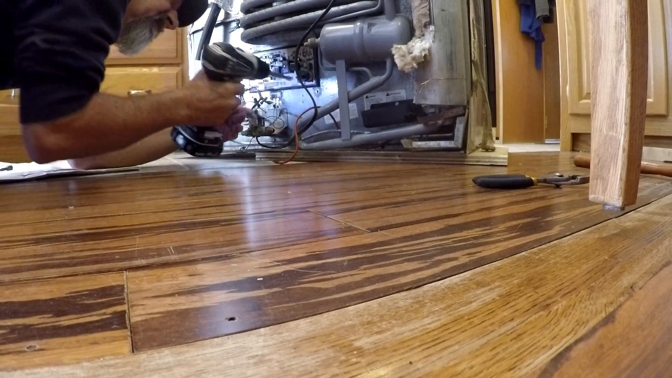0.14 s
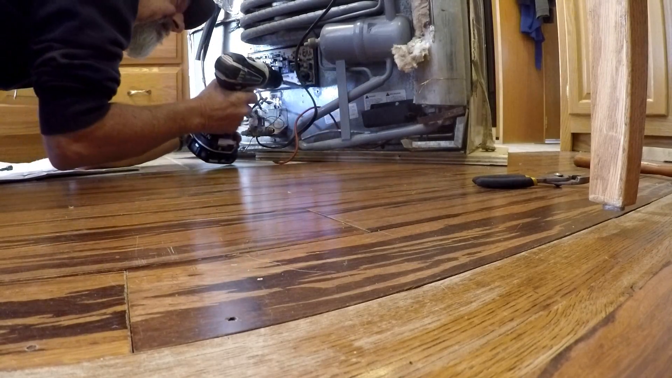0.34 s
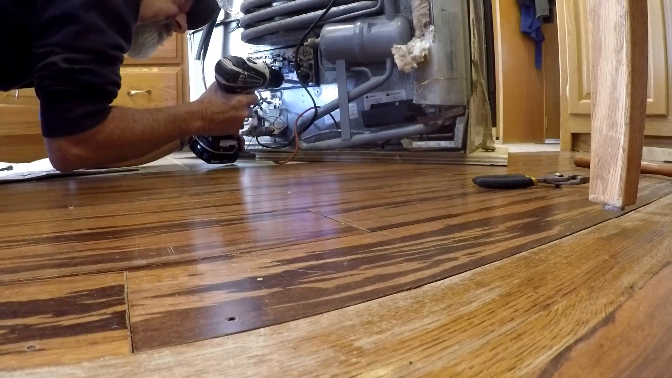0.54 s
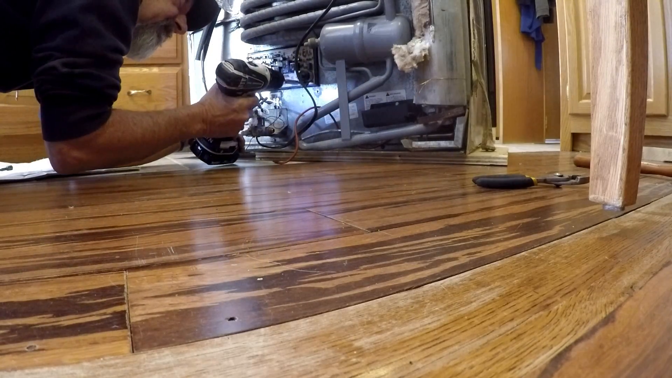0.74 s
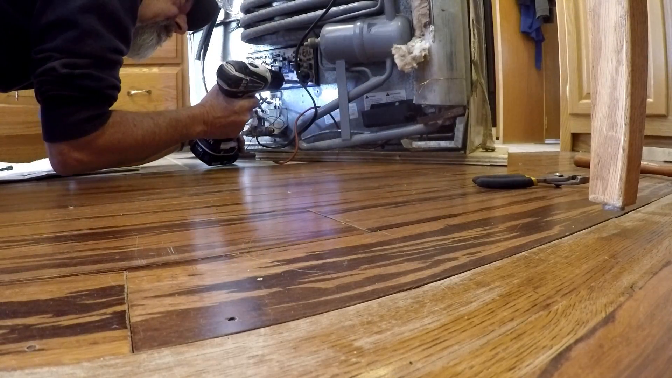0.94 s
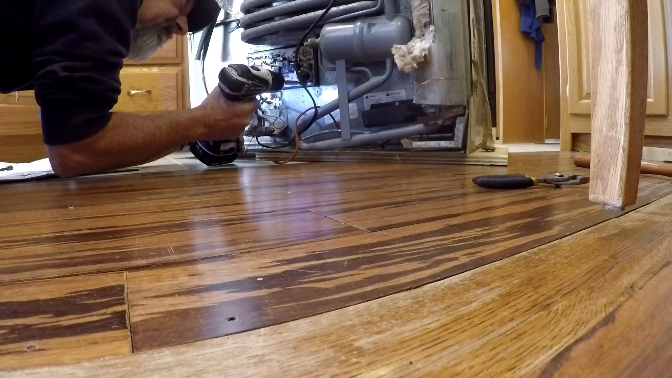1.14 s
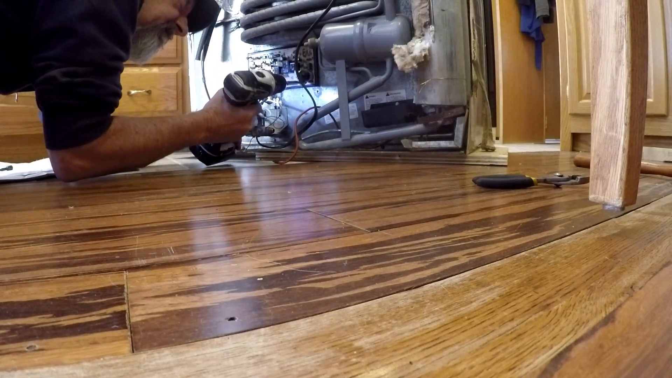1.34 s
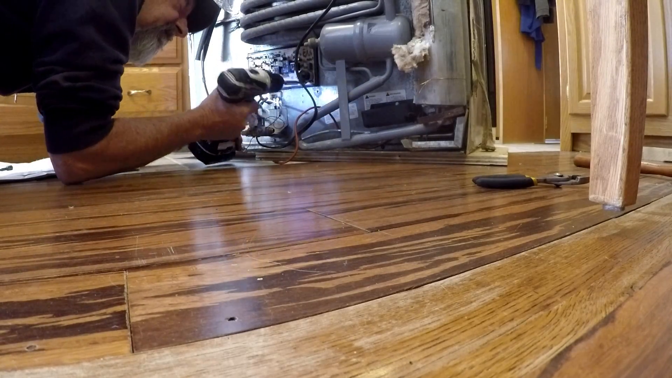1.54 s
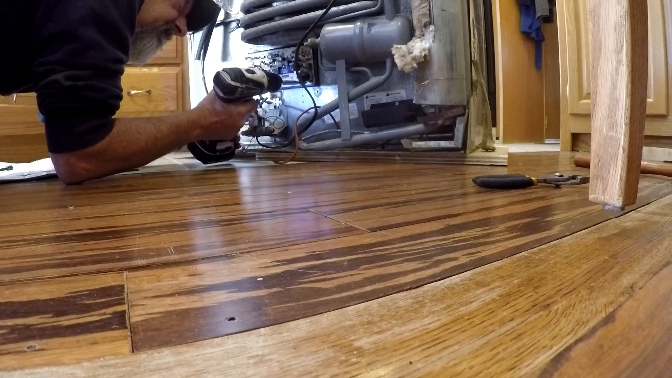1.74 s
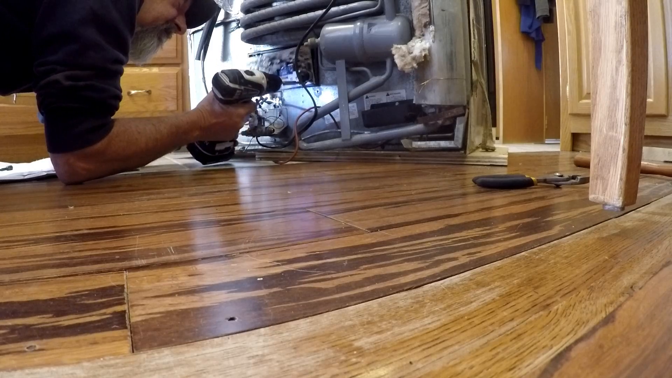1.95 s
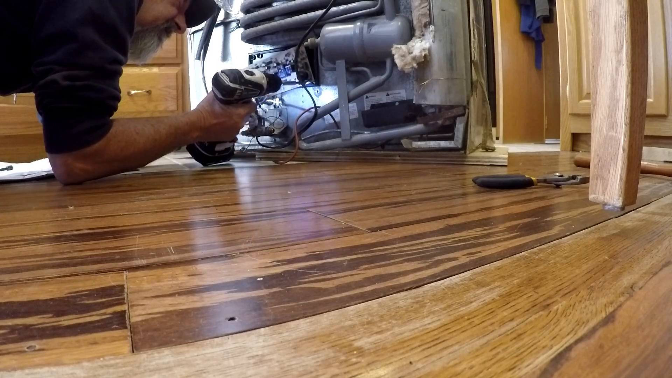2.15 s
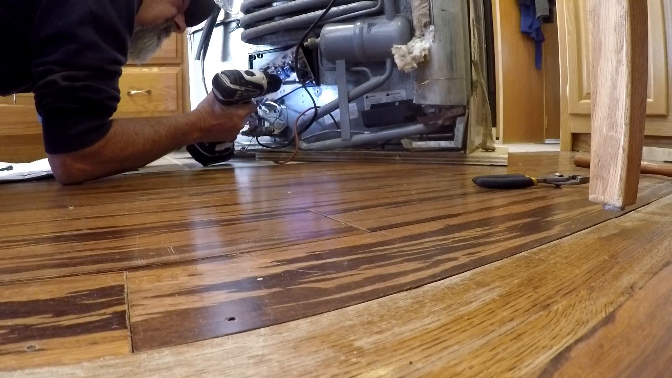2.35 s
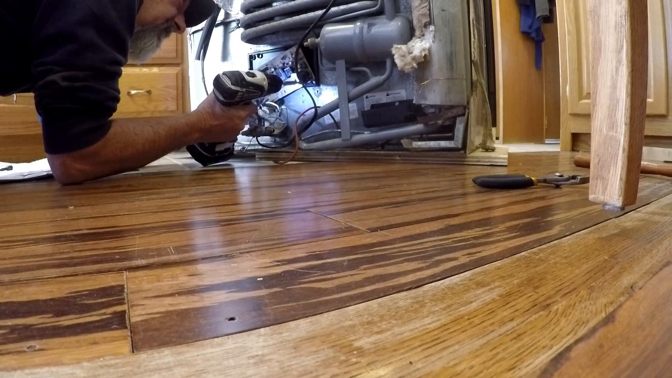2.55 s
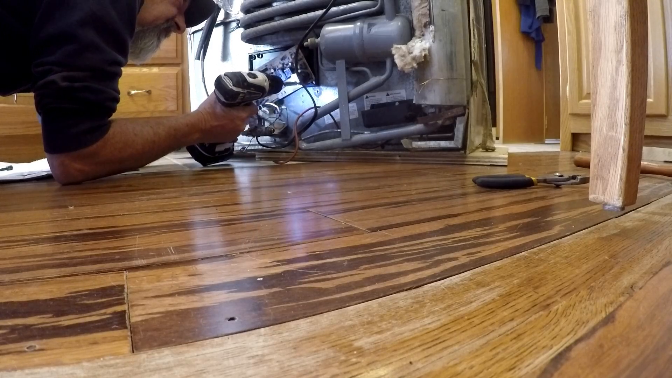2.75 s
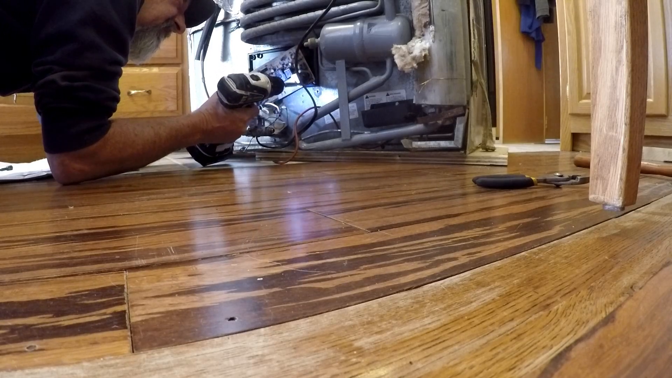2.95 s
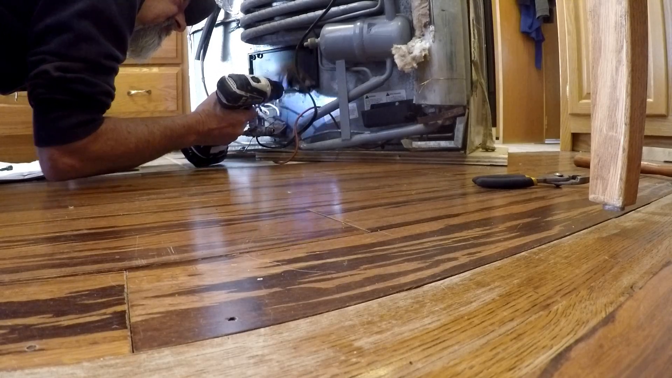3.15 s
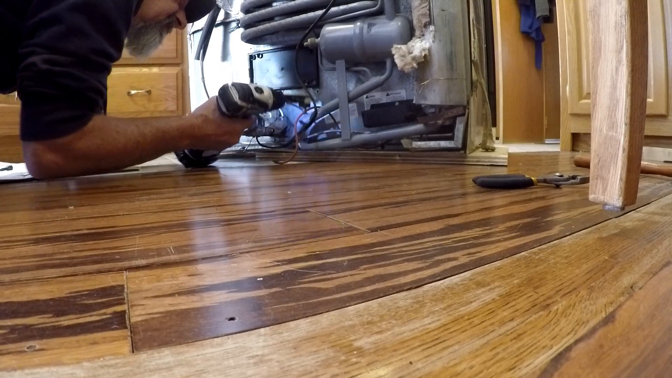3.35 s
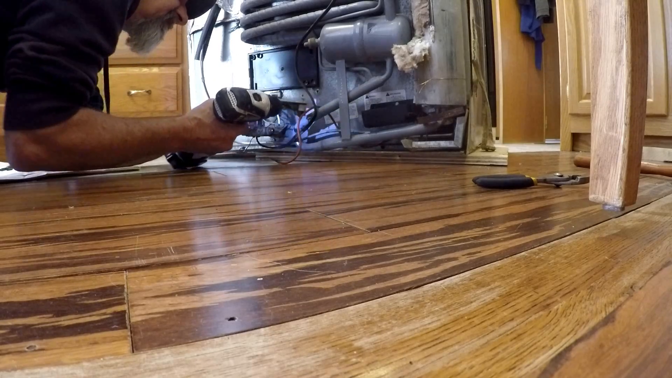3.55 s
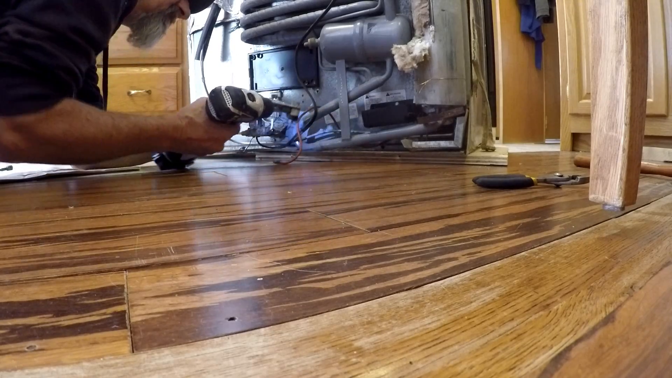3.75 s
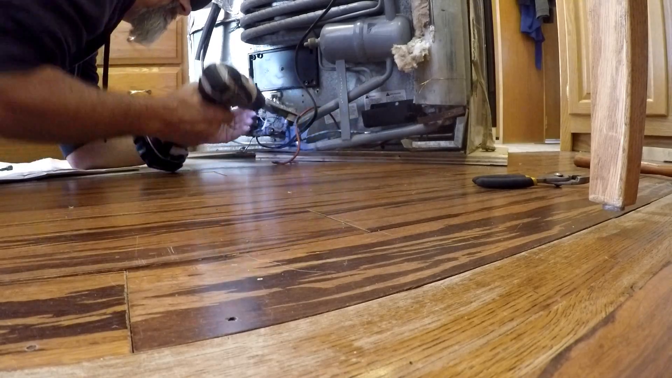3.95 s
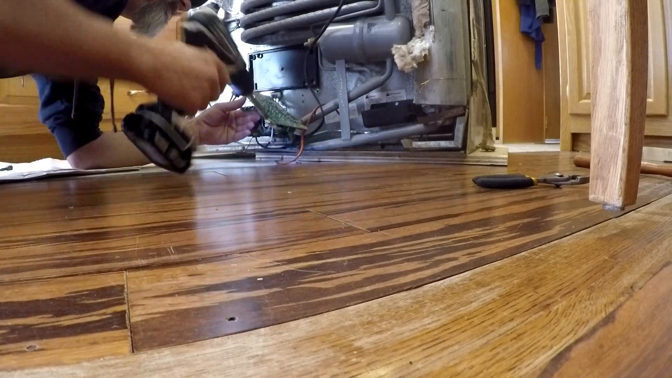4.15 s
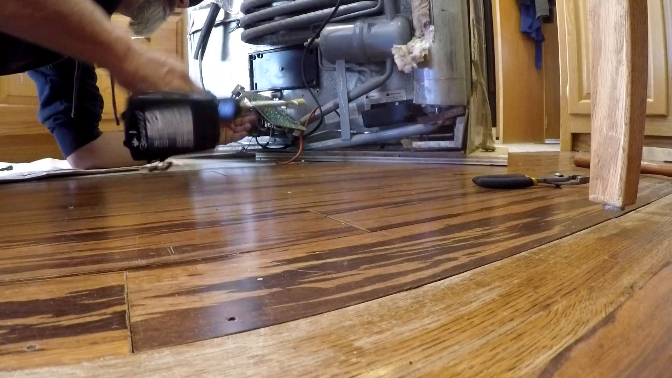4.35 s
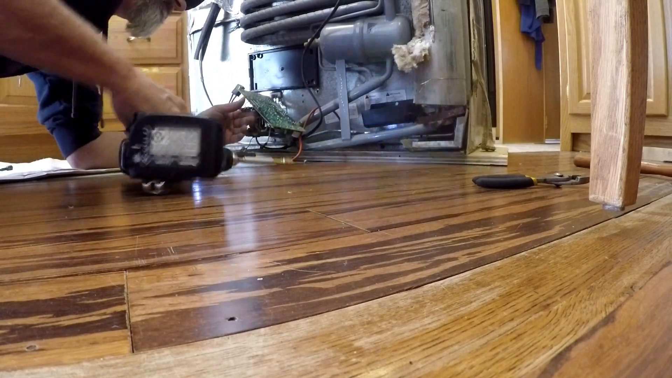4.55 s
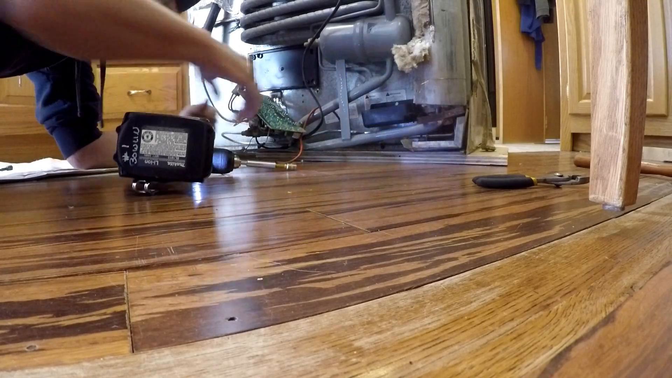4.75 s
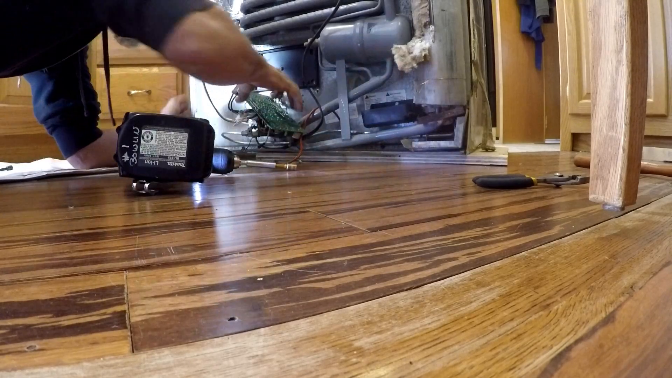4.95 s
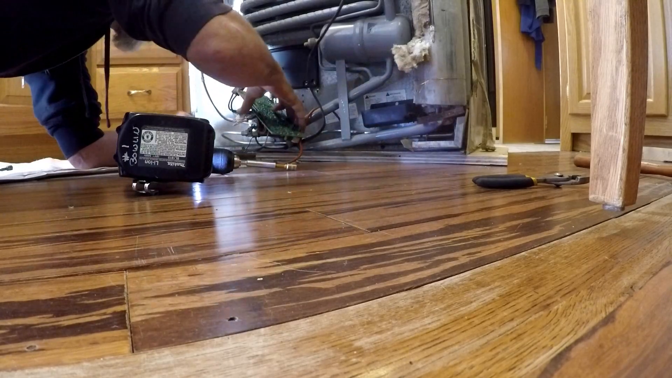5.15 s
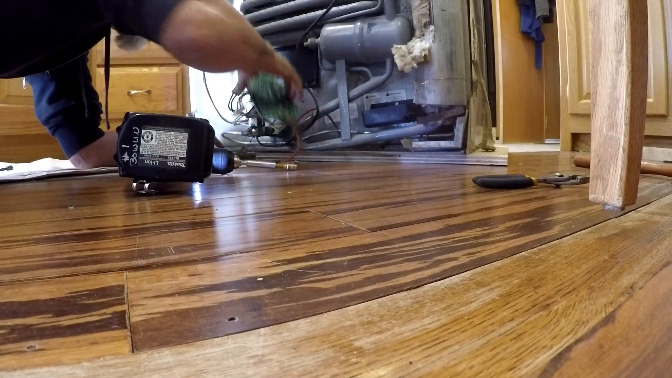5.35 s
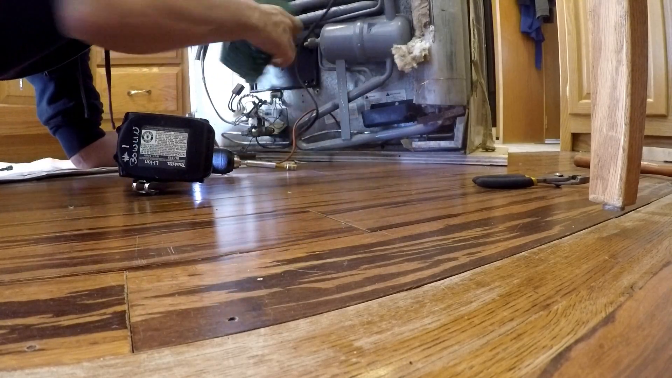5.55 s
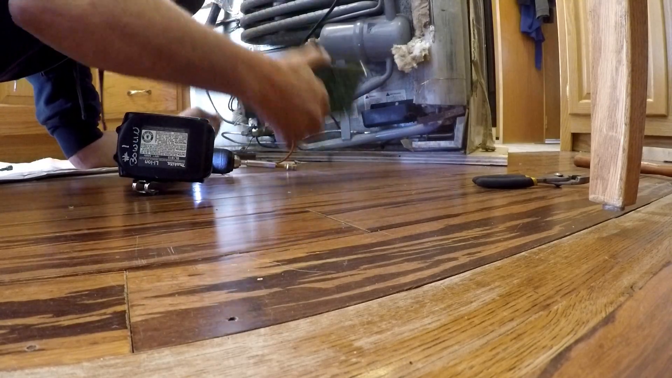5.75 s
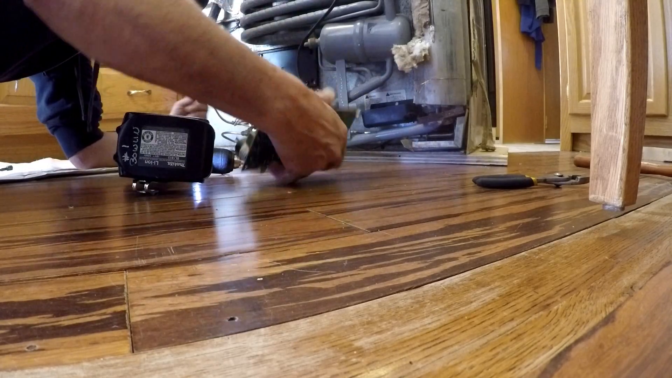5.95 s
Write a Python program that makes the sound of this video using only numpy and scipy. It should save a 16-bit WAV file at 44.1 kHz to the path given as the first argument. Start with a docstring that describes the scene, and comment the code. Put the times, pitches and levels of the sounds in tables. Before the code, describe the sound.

Rubbing and thumps near the floor, a short drill burst and a longer gritty whirr, then screws chinking, a part dragging and the drill set down.

```python
"""Fan hum throughout: wavering tones over shaped noise. Handling rubs and rustles; taps ring a panel, the bit is
seated (thin whirr, thumps), then a drill just above a wooden floor gives a blip and a long run, backing a screw
out of an appliance: shaft-order partials, gear lines, noise. Loose screws chink (decaying modes), a part drags,
the drill is laid on the boards and rocks; rubbing and a last drag follow as a metal part is worked free.
The microphone lies on the same boards, so contacts carry a thud; nearly all sound is in the right channel."""
import sys
import numpy as np
from scipy import signal
from scipy.fft import rfft, irfft, next_fast_len
from scipy.io import wavfile
from scipy.ndimage import uniform_filter1d, map_coordinates

SR = 44100
rng = np.random.default_rng(int(sys.argv[2]) if len(sys.argv) > 2 else 0)


def transcribe(signal):
    """Save signal, clipped to [-1, 1], as a 16-bit WAV file at the path in sys.argv[1]."""
    frames = np.atleast_2d(signal).T
    limited = np.clip(frames, -1, 1)
    pcm = np.round(limited * 32767).astype(np.int16)
    wavfile.write(sys.argv[1], SR, pcm)


N = 264600
TIME = np.arange(N) / SR

# Source levels are relative, ahead of MIX_GAIN. Spectra and modes give shape only; they are normalised.
# fan tones: f/Hz, level/dB relative
HUM_TONES = [(58.5, -27.5), (192, 0.5), (268, -8), (345, -14), (632, -17.5)]
# hum swells and dips: t/s, level/dB
HUM_LEVEL = [(0.0, -37), (1.3, -28), (2.15, -34.5), (3.3, -34), (3.5, -39), (4.68, -34), (4.9, -41),
             (6.0, -30)]
# room rumble and hiss spectrum: f/Hz, level/dB
AIR_SPECTRUM = [(9, -20), (18, -3.5), (90, -0.5), (140, -1), (230, -23.5), (370, -21.5), (620, -19),
                (1300, -30.5), (5300, -38.5), (9900, -43.5), (13000, -120)]
# room decay: f/Hz, t60/s
ROOM_DECAY = [(150, 0.3), (1000, 0.18), (4000, 0.17), (10000, 0.075)]
# left against right: f/Hz, level/dB
LEFT_LEAK = [(60, -25.5), (250, -28.5), (500, -34), (1000, -37), (2000, -37.5), (4000, -44), (9000, -52)]
# passband ahead of hiss and limiting: f/Hz, level/dB
PASSBAND = [(9950, 0), (10250, -45), (11000, -80)]
# final top cut: f/Hz, level/dB
TOP_CUT = [(14500, 0), (15600, -20), (16500, -80)]

# arm, sleeve, parts sliding: start/s, end/s, rubbing/dB, scraping/dB, rustling/dB (mid-stroke, before trims),
# swell/(dB/s)
STROKES = [(0.091, 0.406, -35, -48, -50, 5), (0.509, 1.649, -25, -46, -61, 10),
           (1.7, 1.865, -26, -43, -59, 54), (3.669, 4.092, -33.5, -48, -48, -1),
           (4.435, 4.708, -35.5, -47.5, -56.5, 10), (5.373, 5.676, -31.5, -44.5, -49, 0),
           (5.724, 5.996, -30.5, -50, -54, 16)]
# part dragged across metal: start/s, end/s, first judder/dB, scraping/dB, crackle/dB (before trims)
DRAGS = [(4.125, 4.18, -18.5, -41.5, -44), (4.215, 4.359, -17, -35.5, -31), (5.787, 5.862, -30, -36.5, -44)]
# rubbing spectrum, through the floor: f/Hz, level/dB
RUB_SPECTRUM = [(35, -35), (60, 1), (115, 5), (160, -13.5), (192, 2.5), (232, -6.5), (268, 3), (300, -3),
                (340, -5), (450, -9), (620, -12.5), (1000, -20), (1500, -48), (2600, -120)]
# metal scraping spectrum: f/Hz, level/dB
SCRAPE_SPECTRUM = [(470, -30), (800, 3), (1150, -3.5), (1550, -6.5), (2100, -4), (2700, -10), (3800, -21.5),
                   (4500, -13.5), (5900, -46), (9900, -120)]
# rustle and crackle spectrum: f/Hz, level/dB
RUSTLE_SPECTRUM = [(2060, -23), (3500, -8), (3830, -6), (4560, -14), (5220, -6), (5640, -11), (9880, -11.5),
                   (12800, -20), (21700, -120)]
# stick-slip judder spectrum: f/Hz, level/dB
JUDDER_SPECTRUM = [(50, -11), (110, 2), (200, 1), (280, 3), (360, -15), (700, -23.5), (1100, -41.5),
                   (2000, -80)]

# floorboard modes: f/Hz, level/dB, t60/s
BOARD_MODES = [(192, -8.5, 0.1), (226, 1, 0.12), (256.6, -5.5, 0.044), (290, -2.5, 0.054),
               (332.5, -2.5, 0.1), (433, -8.5, 0.056), (526, -11.5, 0.039)]
# whole-floor modes: f/Hz, level/dB, t60/s
JOIST_MODES = [(67, -39, 0.13), (93.4, 16.5, 0.11), (98.4, 19.5, 0.094), (128, -19, 0.049)]
# loose-screw modes: f/Hz, level/dB, t60/s
SCREW_MODES = [(2860, -10, 0.09), (2860, -15, 0.22), (5900, -8, 0.22), (6440, 9.5, 0.046), (7180, 10, 0.05),
               (7690, -4, 0.31), (7960, 9.5, 0.09), (8900, 1, 0.088), (9590, 4.5, 0.061)]
# bit modes: f/Hz, level/dB, t60/s
BIT_MODES = [(8075, 0, .07), (8170, -14, .04)]
# panel modes: f/Hz, level/dB, t60/s
PANEL_MODES = [(1018, 4, 0.071), (910, -17, 0.079), (654, -2, 0.076)]
# drill case modes: f/Hz, level/dB, t60/s
CASE_MODES = [(2630, -7, 0.032), (2680, -13, 0.029), (5170, -1, 0.016)]
# hollow-knock band: f/Hz, level/dB
KNOCK_BAND = [(250, -18.5), (480, 2), (680, 6.5), (850, 4.5), (1100, 2), (1500, -8), (2400, -39)]
# clack band: f/Hz, level/dB
CLACK_BAND = [(800, -64), (1500, -6), (2400, -0.5), (3300, -5.5), (4500, -9), (7000, -26)]
# tick band: f/Hz, level/dB
TICK_BAND = [(2800, -14), (4600, 0.5), (6500, 2.5), (8500, 2.5), (10000, -5.5), (15000, -53.5)]

# drill body bumps panel or floor: t/s, thud/dB, clack against thud/dB, nominal t60/s
THUMPS = [(1.055, -13.5, -11.5, 0.013), (1.5346, -10, -11, 0.1), (1.583, -5.5, -18.5, 0.021),
          (1.6008, -5, -5.5, 0.04), (1.8336, -13.5, -21.5, 0.16), (1.9003, -5.5, 0.5, 0.013),
          (1.9944, -9.5, -11, 0.017), (4.2032, -11, -4.5, 0.014), (4.7464, -6.5, -14.5, 0.037),
          (4.815, -13.5, -10.5, 0.027)]
# hollow housing knocks, also gear take-up and stop: t/s, knock/dB, clack against knock/dB, nominal t60/s
KNOCKS = [(0.8098, -22.5, -22, 0.035), (1.165, -27, -7.5, 0.085), (1.3654, -26, -8, 0.026),
          (2.1376, -13.5, 0, 0.025), (3.4162, -10, 1.5, 0.018), (4.4094, -28.5, -6, 0.026),
          (4.8811, -13, -2, 0.078), (4.9901, -18.5, -2.5, 0.03), (5.0394, -23, -5, 0.055),
          (5.2862, -23.5, -12.5, 0.0072), (5.5591, -18.5, -15, 0.016), (5.706, -22.5, -11, 0.017)]
# trigger, chuck and loose parts: t/s, level/dB, nominal t60/s, bright tilt/dB
CLICKS = [(0.7359, -30, 0.032, -11.5), (0.894, -31.5, 0.028, -3), (1.8725, -22, 0.024, -1),
          (2.117, -24.5, 0.025, -11.5), (2.584, -14.5, 0.018, 9), (3.4379, -10.5, 0.014, -4),
          (3.484, -14.5, 0.058, 3.5), (3.5043, -15, 0.055, 1), (3.6072, -25, 0.015, -2),
          (3.6295, -25.5, 0.039, 0), (3.681, -30, 0.038, 2.5), (4.0041, -12.5, 0.011, 2),
          (4.072, -17, 0.02, -1.5), (4.1063, -11.5, 0.015, -2.5), (4.1492, -22.5, 0.058, 0),
          (4.1988, -15, 0.018, -4), (4.2294, -22, 0.067, 7.5), (4.2825, -20, 0.13, 0),
          (4.3531, -23.5, 0.017, -5), (4.3625, -20, 0.046, -5.5), (4.8469, -16, 0.021, 0.5),
          (4.9107, -20.5, 0.021, 3), (4.9665, -35, 0.018, -7), (5.5244, -25, 0.054, 6.5),
          (5.6538, -30.5, 0.056, 7.5)]
# loose screws land: t/s, impact/dB, nominal t60/s, ringing/dB
CHINKS = [(3.7288, -14, 0.067, -7), (3.8796, -10, 0.09, -9), (3.9262, -1, 0.041, -31),
          (3.9514, -8, 0.033, -35)]
# drill jolts against the panel: t/s, level/dB
SLIPS = [(2.641, -6), (2.681, -10), (2.735, -13.5), (3.2, -9.5)]
# heavy blows shake the whole floor: t/s, level/dB
BOOMS = [(1.604, -32), (1.996, -9.5), (3.241, -26), (4.205, -19), (4.749, -11.5), (4.817, -12.5),
         (4.886, -15), (4.991, -22.5)]
# drill rocks on its side: t/s, level/dB
ROCKS = [(4.8482, -18.5), (4.8813, -19), (4.91, -15.5)]
# bit rattles in its chuck: t/s, level/dB before trim
PINGS = [(4.7514, -15), (4.8833, -24)]
# bit seeks the screw head, panel rings: t/s, level/dB before trim
TAPS = [(0.814, -28), (1.171, -25)]

# trigger pulls: pressed/s, released/s, limit of whine f/Hz (ten times shaft speed)
PULLS = [(1.871, 1.968, 2230), (2.1215, 3.393, 2874)]
# motor partials, three groups: nominal shaft order, level/dB in group, extra at full torque/dB
LOW_ORDERS = [(3, -0.5, 0), (9, -9, -2), (10, -1.5, 3.5)]
# as above
MID_ORDERS = [(15, -18, 5.9), (18, -15, 8), (20, 2, 7.5)]
# as above
HIGH_ORDERS = [(22, -22, 3), (29, -16, 7), (30, -2.5, 3)]
# gear grinding spectrum: f/Hz, level/dB
GRIND_SPECTRUM = [(440, -53), (750, -3.5), (788, -31), (871, -2.5), (909, -8.5), (1180, -13), (1320, -13),
                  (1730, -15), (2110, -7.5), (2660, -11), (2780, -14.5), (3150, -10), (5500, -8),
                  (7150, -43), (12100, -120)]
# drill hiss spectrum: f/Hz, level/dB
HISS_SPECTRUM = [(2940, -22), (5000, -7), (5380, -24), (5540, -9), (6000, 1), (6410, 5.5), (7390, -0.5),
                 (8160, 3.5), (8330, -4), (8590, 5), (8940, -14.5), (9020, 0), (9880, -4), (12800, -72),
                 (21700, -120)]
# panel shudder spectrum: f/Hz, level/dB
SHUDDER_SPECTRUM = [(21, -38), (35, -35), (65, 4), (151, -8.5), (188, 3.5), (260, -2.5), (326, 2.5),
                    (431, -14.5), (579, -6.5), (788, -15.5), (845, -31), (906, -45), (1000, -19),
                    (1300, -30), (2200, -120)]
# seating whirr spectrum: f/Hz, level/dB
WHIRR_SPECTRUM = [(2200, -48), (2400, -4), (2700, -26), (2855, 5), (3010, -21), (3600, -40)]

# rumble and hiss; share of the hum's dB swell they follow
AIR_DB, AIR_FOLLOWS = -33.5, 0.42
MIX_GAIN, ROOM_DB, LEFT_HISS_DB, LEFT_DELAY_SAMPLES = 2, -15.5, -68.5, 3

STROKE_FADE_S, DRAG_FADE_S, JUDDER_FALL_DB_PER_S = 0.096, 0.019, 105
RUB_TRIM_DB, SCRAPE_TRIM_DB, RUSTLE_TRIM_DB = -5.5, -3.5, -0.5
JUDDER_TRIM_DB, GRATE_TRIM_DB, CRACKLE_TRIM_DB = -2, -2, -0.5
STRAY_DB, STRAY_SPREAD_DB, STRAY_T60_S = -36, 1.5, 0.041

# mixes: thud/dB, knock/dB, clack/dB, tick/dB
CLICK_MIX_DB = (-13, -11.5, -1, -2.5)
CHINK_MIX_DB = (-33, -13, -11, -2)
# knock against the mean of thud and clack; ticks against the clack; thud against the knock
THUMP_KNOCK_DB, THUMP_TICK_DB = -2, -8.5
KNOCK_THUD_DB, KNOCK_TICK_DB = -10.5, -18
THUMP_RISE_S = 0.0011  # heavy, padded contact: slower than a click
SLIP_DAMP_T60_S, PING_TRIM_DB, TAP_TRIM_DB = 0.11, -1.5, 0.5

SPIN_UP_S, BRAKE_HZ_PER_S = 0.037, 20000  # exponential run-up, even braking
SAG_SHARE, SAG_S = 0.04, 0.24  # a tight screw holds the speed down at first
GEAR_ATTACK_S, GEAR_RELEASE_S = 0.034, 0.016
DIP_S, DIP_FALL_S, DIP_RECOVER_S = 2.595, 0.021, 0.19
# drill layers: start of pull/dB, drift as the screw comes out/(dB/s), dip scale/dB
WHINE_LEVEL = (-31.5, 0.37, 8)
SECOND_LEVEL = (-34, 0.94, 22)
THIRD_LEVEL = (-31, 9.8, 11)
GRIND_LEVEL = (-28.5, 0, 8)
HISS_LEVEL = (-24, -1.5, 8.6)
SHUDDER_LEVEL = (-25, 3.44, 0)
TORQUE_GRIND_DB = 2.5  # extra at full torque
BUZZ_DB, BUZZ_SURGE_DB = -10.5, 6  # gear lines against steady grinding; extra at full torque
FREE_S, FREE_FADE_S, FREE_DROP_DB = 3.29, 0.032, 7  # screw clear: panel shakes less
WHIRR_START_S, WHIRR_END_S, WHIRR_DB = 1.3, 2.1, -56


def amp(db):
    """Decibels to gain."""
    return 10 ** (np.asarray(db) / 20)


def unit(x):
    """Scale to rms 1."""
    return x / np.sqrt(np.mean(x ** 2) + 1e-20)


def crest(x):
    """Scale to peak 1."""
    return x / (np.abs(x).max() + 1e-20)


def along(points, hz):
    """Interpolate (f/Hz, value) points on a log frequency axis."""
    f, v = np.transpose(points)
    return np.interp(np.log(hz + 1), np.log(f + 1), v)


def during(start_s, end_s, fade_s):
    """1 from start to end, with ramps outside."""
    return np.clip(1 + np.minimum(TIME - start_s, end_s - TIME) / fade_s, 0, 1)


def wobble(rate_hz):
    """Smooth random curve, rate_hz knots a second."""
    knots = rng.standard_normal(int(N * rate_hz / SR) + 4)
    return map_coordinates(knots, [TIME * rate_hz])


def filtered(x, response):
    """Apply a frequency response by FFT."""
    size = next_fast_len(len(x) + 8192)
    return irfft(rfft(x, size) * response(np.fft.rfftfreq(size, 1 / SR)), size)[:len(x)]


def shaped(x, points):
    """Apply a (f/Hz, level/dB) response."""
    return filtered(x, lambda hz: amp(along(points, hz)))


def noise(spectrum, grain_db=0, patchy_db=0):
    """Coloured noise, rms 1: millisecond grains scatter by grain_db, passing resonances by patchy_db."""
    drive = rng.standard_normal(N) * amp(grain_db * wobble(400))
    z = signal.stft(drive, nperseg=512)[2]
    field = uniform_filter1d(rng.standard_normal(z.shape), size=3, axis=0)
    field = uniform_filter1d(field, size=7, axis=1)
    drive = signal.istft(z * amp(patchy_db * unit(field)), nperseg=512)[1][:N]
    return unit(shaped(drive, spectrum))


def causal(spectrum, ripple_db, size=1024):
    """Minimum-phase impulse response with random peaks and dips for the spot struck."""
    hz = np.fft.rfftfreq(size, 1 / SR)
    ripple = unit(uniform_filter1d(rng.standard_normal(len(hz)), size=9))
    cepstrum = irfft(np.log(amp(along(spectrum, hz) + ripple_db * ripple)))
    # fold the cepstrum onto positive time
    cepstrum[1:size // 2] *= 2
    cepstrum[size // 2 + 1:] = 0
    return irfft(np.exp(rfft(cepstrum)))


def ring(modes, attack_s, detune=0):
    """One blow on decaying modes: random strengths, pitches shifted by the load (detune); peak 1."""
    t = TIME[:SR // 2]
    tone = np.zeros(len(t))
    for hz, db, t60_s in modes:
        mode_hz = hz * (1 + detune * rng.normal())
        mode_db = db + 2 * rng.normal()
        tone += amp(mode_db - 60 * t / t60_s) * np.sin(2 * np.pi * mode_hz * t)
    return crest(tone * (1 - np.exp(-t / attack_s)))


def add(track, start_s, x):
    """Mix x into the track at start_s."""
    part = track[max(round(start_s * SR), 0):][:len(x)]
    part += x[:len(part)]


def room(x):
    """Room answer: decaying noise whose treble dies first."""
    hz, t, z = signal.stft(rng.standard_normal(SR // 2), SR, nperseg=256)
    decay = amp(-60 * t / along(ROOM_DECAY, hz)[:, None])
    tail = signal.istft(z * decay, SR, nperseg=256)[1]
    return signal.fftconvolve(x, tail / np.linalg.norm(tail))[:N]


def fan():
    """Tones wavering in level and phase over low rumble and faint hiss."""
    hum = np.zeros(N)
    for hz, db in HUM_TONES:
        hum += amp(db + wobble(5)) * np.sin(2 * np.pi * hz * TIME + wobble(6) * hz / 800)
    hum_db = np.interp(TIME, *np.transpose(HUM_LEVEL))
    air_db = AIR_DB + AIR_FOLLOWS * (hum_db - hum_db.mean())
    return amp(hum_db) * hum + amp(air_db) * noise(AIR_SPECTRUM)


def strokes():
    """Sliding contact: grainy rubbing through the floor, metal scraping, rustling cloth."""
    rub = amp(RUB_TRIM_DB) * noise(RUB_SPECTRUM, grain_db=1.5, patchy_db=2.5)
    scrape = amp(SCRAPE_TRIM_DB) * noise(SCRAPE_SPECTRUM, grain_db=2.0, patchy_db=2.5)
    rustle = amp(RUSTLE_TRIM_DB) * noise(RUSTLE_SPECTRUM, grain_db=2.5, patchy_db=2)
    out = np.zeros(N)
    for start, end, rub_db, scrape_db, rustle_db, swell_db_per_s in STROKES:
        swell = amp(swell_db_per_s * (np.clip(TIME, start, end) - (start + end) / 2))
        slide = amp(rub_db) * rub + amp(scrape_db) * scrape + amp(rustle_db) * rustle
        out += during(start, end, STROKE_FADE_S) * swell * slide
    return out


def drags():
    """Stick-slip under pressure: judder that dies once the part moves, scraping, dense fine clicks."""
    judder = amp(JUDDER_TRIM_DB) * noise(JUDDER_SPECTRUM, grain_db=6.0)
    grate = amp(GRATE_TRIM_DB) * noise(SCRAPE_SPECTRUM, grain_db=2.0, patchy_db=2.3)
    crackle = amp(CRACKLE_TRIM_DB) * noise(RUSTLE_SPECTRUM, grain_db=6, patchy_db=6.5)
    out = np.zeros(N)
    for start, end, judder_db, grate_db, crackle_db in DRAGS:
        sticking = amp(judder_db - JUDDER_FALL_DB_PER_S * np.maximum(TIME - start, 0))
        drag = sticking * judder + amp(grate_db) * grate + amp(crackle_db) * crackle
        out += during(start, end, DRAG_FADE_S) * drag
    return out


def blow(levels_db, t60_s, rise_s=0.00043, after_db=-25, after_t60_s=0.28):
    """A contact thuds in the boards and excites dense, short modes of plastic and sheet metal."""
    thud_db, *bands_db = levels_db
    out = amp(thud_db) * ring(BOARD_MODES, attack_s=0.0014, detune=0.048)
    t = TIME[:SR // 5]
    after = amp(after_db - 60 * t / after_t60_s)  # weak after-ring of the cabinet
    # low modes ring longest
    for band, band_db, life in zip((KNOCK_BAND, CLACK_BAND, TICK_BAND), bands_db, (1.3, .9, .95)):
        main = amp(-60 * t / (life * max(t60_s, .005)))
        decay = (main + after) * (1 - np.exp(-t / rise_s))
        burst = signal.fftconvolve(decay * rng.standard_normal(len(t)), causal(band, ripple_db=2.0))
        add(out, 0, amp(band_db) * crest(burst))
    return out


def strays(count=2):
    """Faint clicks at random times in each stroke: the hand nudges loose parts."""
    out = np.zeros(N)
    for start, end, *_ in STROKES:
        for s in rng.uniform(start, end, count):
            db = STRAY_DB + STRAY_SPREAD_DB * rng.normal()
            add(out, s, blow(db + np.array(CLICK_MIX_DB), STRAY_T60_S))
    return out


def clicks():
    """Sharp contacts; the tilt trades thud and knock for tick."""
    out = np.zeros(N)
    for s, db, t60_s, bright_db in CLICKS:
        tilt_db = bright_db * np.array([-1, -1, 0, 1])
        add(out, s, blow(db + np.array(CLICK_MIX_DB) + tilt_db, t60_s))
    return out


def chinks():
    """Landing screws: a bright blow plus the screw's own modes."""
    out = np.zeros(N)
    for s, db, t60_s, ring_db in CHINKS:
        add(out, s, blow(db + np.array(CHINK_MIX_DB), t60_s))
        add(out, s, amp(ring_db) * ring(SCREW_MODES, attack_s=.0004))
    return out


def knocks():
    """Hollow housing blows, levels set against the knock band."""
    out = np.zeros(N)
    for s, db, hard_db, t60_s in KNOCKS:
        mix_db = np.array([KNOCK_THUD_DB, 0, hard_db, hard_db + KNOCK_TICK_DB])
        add(out, s, blow(db + mix_db, t60_s))
    return out


def thumps():
    """Heavy, slow-rising blows, levels set against the board thud."""
    out = np.zeros(N)
    for s, db, hard_db, t60_s in THUMPS:
        mix_db = np.array([0, hard_db / 2 + THUMP_KNOCK_DB, hard_db, hard_db + THUMP_TICK_DB])
        add(out, s, blow(db + mix_db, t60_s, rise_s=THUMP_RISE_S))
    return out


def slips():
    """Board thumps damped by the hand pressing on the drill."""
    damping_db = -60 * TIME[:SR // 2] / SLIP_DAMP_T60_S
    out = np.zeros(N)
    for s, db in SLIPS:
        add(out, s, amp(db + damping_db) * ring(BOARD_MODES, attack_s=0.0012, detune=0.017))
    return out


def booms():
    """Slow-rising low modes of the whole floor."""
    out = np.zeros(N)
    for s, db in BOOMS:
        add(out, s, amp(db) * ring(JOIST_MODES, attack_s=0.01, detune=0.031))
    return out


def ringing():
    """Modes of case, bit and panel ring on after their blows."""
    out = np.zeros(N)
    for s, db in ROCKS:
        add(out, s, amp(db) * ring(CASE_MODES, attack_s=0.00033))
    for s, db in PINGS:
        add(out, s, amp(db + PING_TRIM_DB) * ring(BIT_MODES, attack_s=0.0011))
    for s, db in TAPS:
        add(out, s, amp(db + TAP_TRIM_DB) * ring(PANEL_MODES, attack_s=.003))
    return out


def whirr():
    """Thin band of noise as the bit is seated."""
    return amp(WHIRR_DB) * during(WHIRR_START_S, WHIRR_END_S, fade_s=0.12) * noise(WHIRR_SPECTRUM)


def speed(pressed, released, full_hz):
    """Whine pitch over a pull: run up, creep higher as the screw loosens, brake."""
    t = np.clip(TIME - pressed, 0, released - pressed)
    driven_hz = full_hz * (1 - np.exp(-t / SPIN_UP_S)) * (1 - SAG_SHARE * np.exp(-t / SAG_S))
    return np.maximum(driven_hz - BRAKE_HZ_PER_S * np.maximum(TIME - released, 0), 0)


def layer_db(level, pressed, released):
    """Drill layer level: even drift through a pull, one shared dip."""
    start_db, drift_db_per_s, dip_db = level
    since = np.maximum(TIME - DIP_S, 0)
    dip = np.minimum(since / DIP_FALL_S, 1) * np.exp(-since / DIP_RECOVER_S)
    return start_db + drift_db_per_s * np.clip(TIME - pressed, 0, released - pressed) - dip_db * dip


def motor(pressed, released, full_hz, jitter=0.00163, hunting=0.00096, waver_db=0.8):
    """Fan blades and commutator sing at multiples of the slightly unsteady shaft speed."""
    whine_hz = speed(pressed, released, full_hz)
    # speed change takes torque: partials shift in level and roughen
    slope = np.abs(uniform_filter1d(np.gradient(whine_hz), size=882)) * SR
    torque = np.tanh(slope / 8000)
    shaft_hz = whine_hz / 10 * (1 + jitter * wobble(70) + hunting * wobble(8))
    angle = 2 * np.pi * np.cumsum(shaft_hz) / SR
    backlash_rad = .35 + .25 * torque
    tones = np.zeros(N)
    groups = (WHINE_LEVEL, LOW_ORDERS), (SECOND_LEVEL, MID_ORDERS), (THIRD_LEVEL, HIGH_ORDERS)
    for level, orders in groups:
        group_gain = amp(layer_db(level, pressed, released))
        for order, db, surge_db in orders:
            partial_db = db + surge_db * torque + wobble(45) + waver_db * wobble(9)
            phase = round(order) * angle + backlash_rad * wobble(350)
            tones += group_gain * amp(partial_db) * np.sin(phase)
    return tones * np.sqrt(whine_hz / full_hz), angle, torque


def teeth(angle, count=40):
    """Uneven gear teeth repeat a pattern each turn: equal lines at shaft orders from 7 up."""
    orders = np.arange(count)
    pattern = (orders > 6) * np.exp(2j * np.pi * rng.random(count))
    turn = irfft(pattern, 2048)
    position = (angle / (2 * np.pi) * len(turn)).astype(int) % len(turn)
    return unit(turn[position])


def drill():
    """Motor tones, gear grind and hiss pulsing once a motor turn, the screw shaking the panel."""
    out = np.zeros(N)
    for pressed, released, full_hz in PULLS:
        tones, angle, torque = motor(pressed, released, full_hz)
        grind_db = layer_db(GRIND_LEVEL, pressed, released)
        hiss_db = layer_db(HISS_LEVEL, pressed, released)
        freed = np.clip((TIME - FREE_S) / FREE_FADE_S, 0, 1)
        shudder_db = layer_db(SHUDDER_LEVEL, pressed, released) - FREE_DROP_DB * freed
        attack = np.clip((TIME - pressed) / GEAR_ATTACK_S, 0, 1)
        release = np.exp(-np.maximum(TIME - released, 0) / GEAR_RELEASE_S)
        grind = amp(grind_db + TORQUE_GRIND_DB * torque) * noise(GRIND_SPECTRUM, grain_db=1.0, patchy_db=2.35)
        buzz = amp(grind_db + BUZZ_DB + BUZZ_SURGE_DB * torque) * teeth(angle)
        hiss = amp(hiss_db) * noise(HISS_SPECTRUM, grain_db=1.1, patchy_db=2.0)
        shudder = amp(shudder_db) * noise(SHUDDER_SPECTRUM, grain_db=5.0)
        pulsing = (grind + hiss) * (1 + 0.11 * np.cos(angle))
        out += attack * release * (tones + buzz + pulsing + shudder)
    return out


def scene():
    """Full mix on the right; the left has a faint, dull, slightly late copy and its own hiss."""
    hits = strays() + clicks() + chinks() + knocks() + thumps() + slips() + booms() + ringing()
    background = fan() + amp(ROOM_DB) * room(hits)
    right = MIX_GAIN * (background + strokes() + drags() + hits + whirr() + drill())
    delay = lambda hz: np.exp(-2j * np.pi * hz * LEFT_DELAY_SAMPLES / SR)
    left = filtered(right, lambda hz: amp(along(LEFT_LEAK, hz)) * delay(hz))
    left_hiss = amp(LEFT_HISS_DB) * noise([(100, 0.25), (1000, 0.077), (10000, 1)])
    return np.array([left + left_hiss, right])


def record(dry, hiss_db=-57, duck_db=-27):
    """Cut above 10 kHz, add thin hiss that sinks under bright, loud sound, flatten peaks at full scale."""
    band = np.array([shaped(channel, PASSBAND) for channel in dry])
    bright = filtered(band[1], lambda hz: hz / (hz + 1500))
    power = np.abs(uniform_filter1d(bright ** 2, size=5000))
    ducking = 1 + power / amp(2 * duck_db)
    hiss = amp(hiss_db) * noise([(9000, -40), (10000, 6), (15000, 2.5)]) / ducking
    loud = band + np.array([hiss / 20, hiss])
    clipped = loud / (1 + np.abs(loud) ** 30) ** (1 / 30)
    return np.array([shaped(channel, TOP_CUT) for channel in clipped])


dry = scene()
out = record(dry)
transcribe(out)
```